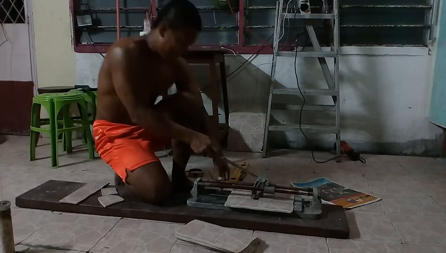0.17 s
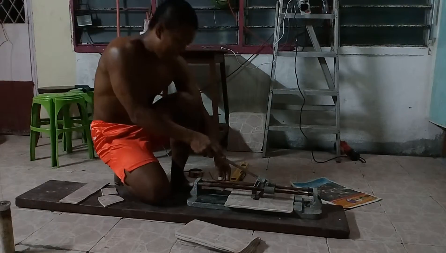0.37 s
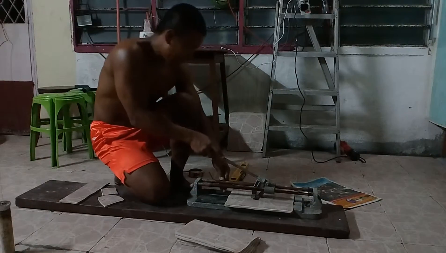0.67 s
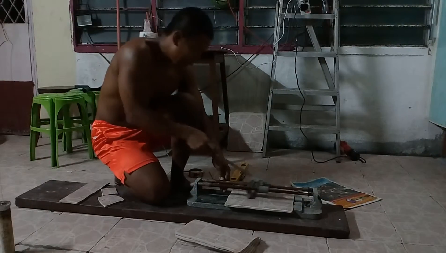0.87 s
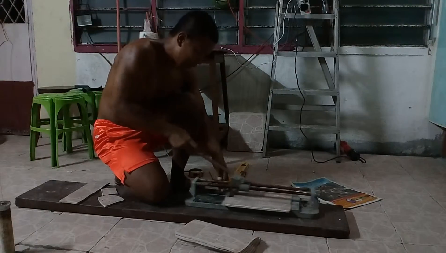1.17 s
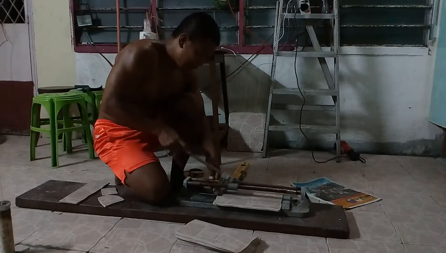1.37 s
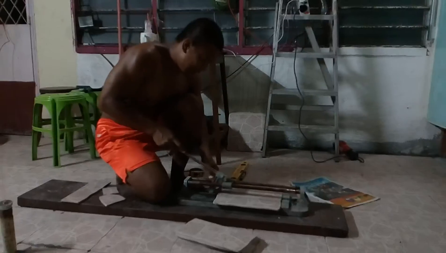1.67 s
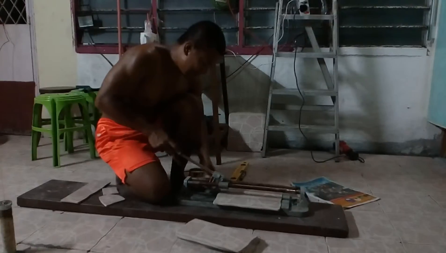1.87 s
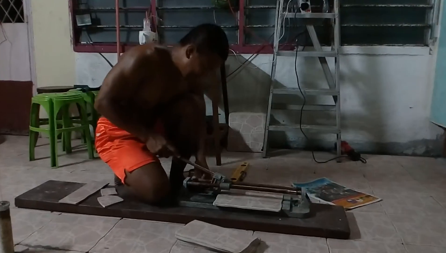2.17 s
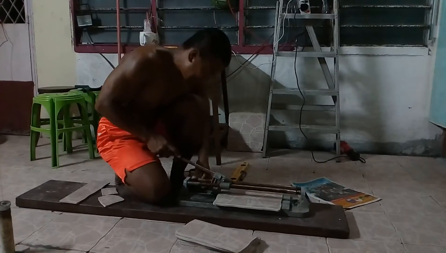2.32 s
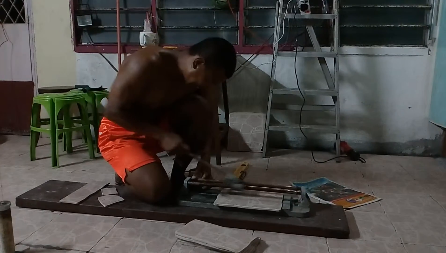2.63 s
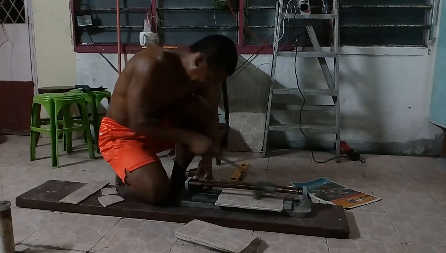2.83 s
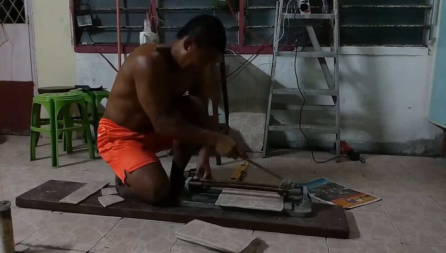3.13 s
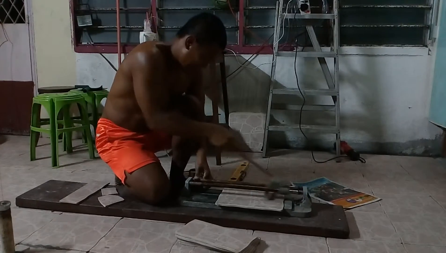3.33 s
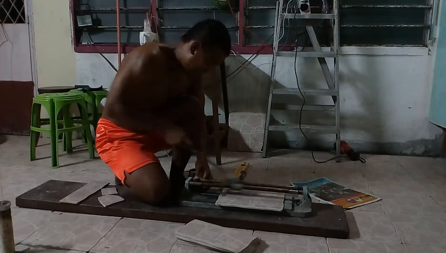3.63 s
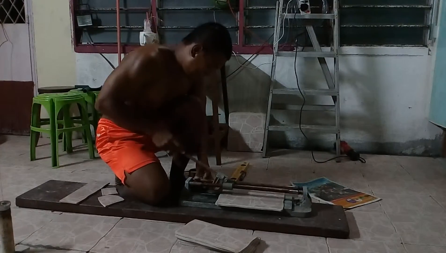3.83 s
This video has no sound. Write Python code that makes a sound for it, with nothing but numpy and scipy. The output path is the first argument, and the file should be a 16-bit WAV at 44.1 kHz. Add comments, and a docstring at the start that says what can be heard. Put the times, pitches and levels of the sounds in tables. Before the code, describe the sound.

A manual tile cutter's wheel loudly scores a tile after quiet handling clanks, in an echoing room.

```python
"""First the carriage of a manual tile cutter is drawn back, then its wheel bites, scores the tile and slides back.
The place is a bare tiled room: the cutter stands close ahead of two microphones, on a wooden board.
A dog barks once off to one side, farther away; a motor drones faintly far off under the room tone.
Scoring, sliding and rubbing are random grit through filters and resonances; knocks and chips are dying tones.
The bark is uneven pulses and gated air through a throat; random echoes set the distances."""
import sys
import numpy as np
from scipy import signal
from scipy.fft import rfft, irfft
from scipy.io import wavfile
from scipy.ndimage import uniform_filter1d, minimum_filter1d, map_coordinates

SR = 44100
rng = np.random.default_rng(int(sys.argv[2]) if len(sys.argv) > 2 else 0)


def store_pcm(level_fs):
    """Save levels as 16-bit WAV."""
    pcm = np.round(np.clip(level_fs, -1, 1) * 32767).astype(np.int16)
    wavfile.write(sys.argv[1], SR, np.atleast_2d(pcm).T)


N = 176400
T = np.arange(N) / SR
FILTER_SIZE = 32768  # samples
HZ = np.fft.rfftfreq(FILTER_SIZE, 1 / SR)

# Levels and spectra are relative, before the mix.
# room tone spectrum [f/Hz, level/dB per Hz]
AIR_SPECTRUM = [(25, -17), (44, -22.5), (67, -9.5), (115, -5), (167, -12.5), (240, -15.5), (520, -21),
                (1100, -29), (2000, -39), (3500, -44), (6500, -47.5), (8500, -63), (15000, -71)]
# partials of the distant motor [f/Hz, level/dB]
MOTOR_PARTIALS = [(62, -63), (82, -59.5), (102.3, -65.5), (123.8, -56.5)]
# slow swell of the motor [t/s, level/dB]
MOTOR_SWELL = [(0, 5), (1.4, 2), (2.3, 0.5), (4, 1.5)]
# decay of the room's echoes [f/Hz, t60/s]
ROOM_DECAY = [(150, 0.33), (600, 0.45), (2000, 0.43), (6000, 0.37), (14000, 0.32)]
# likeness of the diffuse sound at the two microphones [f/Hz, share]
MIC_LIKENESS = [(60, 0.69), (280, 0.83), (550, 0.64), (1000, 0), (3000, 0.062)]
AIR_DB = -49.5
PATH_TURNS_PER_S = 1.3  # how fast the echo paths change

# pitch of the bark, before jitter [t/s, f/Hz]
BARK_PITCH = [(3.66, 240), (3.69, 350), (3.715, 400), (3.742, 472), (3.78, 468), (3.8, 420), (3.825, 240)]
# loudness of the bark [t/s, level/dB]
BARK_LEVEL = [(3.658, -59), (3.678, -27.5), (3.694, -21.5), (3.722, -16.5), (3.745, -15.5), (3.77, -19.5),
              (3.8, -26), (3.84, -46), (3.88, -94)]
# throat resonances [f/Hz, width/Hz, level/dB]
THROAT_MODES = [(469.6, 48, -12), (728.3, 22, 10), (934, 26, -7), (1160, 32, -7), (1290, 51, -5.5),
                (1370, 50, -6), (1520, 25, -2), (1660, 110, -11), (2080, 18, -1), (2260, 35, -4),
                (2755, 60, -9)]
# colour of the muzzle [f/Hz, level/dB]
MUZZLE_SPECTRUM = [(150, -27), (340, -21.5), (450, -3), (600, -3.5), (760, 3), (1100, -2.5), (1400, 1.5),
                   (1800, -5), (2300, -3), (3050, -8), (3700, -36), (6000, -31.5), (12000, -51)]
# mouth opening [t/s, share]
JAW_OPENING = [(3.675, 0.72), (3.72, 1), (3.78, 0.94), (3.83, 0.85)]
BARK_JITTER, BARK_AIR_SHARE, BARK_UNEVEN = 0.045, 0.73, 0.57  # shares
SHUT_HZ = 1520  # lowpass of the nearly shut mouth

# the base shuddering under the carriage [t/s, level/dB]
SHUDDER_LEVEL = [(.88, -61), (.93, -46.5), (1.06, -38.5), (1.2, -39.5), (1.28, -49.5), (1.4, -42.5),
                 (1.47, -47.5), (1.62, -58.5), (2.42, -69), (2.48, -39.5), (2.63, -45), (2.73, -23),
                 (2.88, -30.5), (2.96, -33), (3.12, -34.5), (3.18, -27.5), (3.26, -67.5), (3.5, -51),
                 (3.68, -45.5), (3.8, -75)]
# the base groaning as the carriage sticks and slips [t/s, level/dB]
GROAN_LEVEL = [(1.29, -77), (1.318, -37), (1.355, -43), (1.415, -32.5), (1.45, -39), (1.48, -65),
               (1.56, -43), (1.6, -70.5), (1.64, -65), (1.66, -43.5), (1.69, -51.5), (1.72, -100)]
# knocks of the base on its board [t/s, level/dB, f/Hz]
KNOCKS = [(.92, -40.5, 535), (1.08, -30.5, 673), (1.16, -34, 608), (1.317, -31.5, 418), (1.951, -37, 441.5),
          (2.165, -27, 509.5), (2.711, -18, 520), (2.789, -22.5, 546), (2.861, -21, 499),
          (3.01, -22.5, 415), (3.18, -33, 587)]
# jolts that set the frame ringing [t/s, level/dB]
FRAME_JOLTS = [(1.06, -40), (3.18, -32)]
# the board flexing against the floor [t/s, level/dB]
BOARD_THUMPS = [(2.712, -29.5), (2.805, -22.5), (2.862, -24.5), (3.005, -33)]
# resonances of the cast base [f/Hz, width/Hz, level/dB]
BASE_MODES = [(435, 12, -10), (513.3, 14.4, 10.5), (568, 37, -5), (832, 140, -1.5), (823, 20.4, 3),
              (1085, 46, -9.5)]
# resonances of the wooden board [f/Hz, width/Hz, level/dB]
BOARD_MODES = [(172, 50, -2), (240, 62, -2), (333, 29, 5.5)]
# dull colour of base and board [f/Hz, level/dB]
THUD_SPECTRUM = [(60, -36), (130, -14.5), (270, -2.5), (480, 3.5), (800, 2.5), (1200, -5.5), (2000, -29),
                 (6000, -81)]
GROAN_HZ = 513
KNOCK_T60_S, KNOCK_RISE_S, KNOCK_THUD_DB = 0.12, 0.0007, -8.5
FRAME_HZ, FRAME_T60_S, FRAME_RISE_S = 829, 0.48, 0.0013

# carriage running on the rails [t/s, level/dB]
ROLL_LEVEL = [(.88, -72), (.91, -55), (.965, -49), (.995, -36), (1.035, -34.5), (1.07, -49.5), (1.145, -53),
              (1.165, -41.5), (1.195, -37.5), (1.23, -47.5), (1.52, -59), (1.58, -83)]
# soft sliding and rubbing [start t/s, peak t/s, end t/s, peak level/dB]
SLIDES = [(0.007, 0.112, 0.17, -54.5), (0.292, 0.423, 0.47, -57.5), (1.168, 1.37, 1.595, -37),
          (1.678, 1.864, 1.9, -59.5), (3.32, 3.546, 3.94, -44), (3.64, 3.789, 3.875, -32.5)]
# dry creak of the lever's pivot [t/s, level/dB]
CREAK_LEVEL = [(1.715, -67), (1.745, -49), (1.8, -74), (1.88, -63), (1.92, -82)]
# resonances of the rails [f/Hz, width/Hz, level/dB]
RAIL_MODES = [(1450, 140, -6.5), (2710, 47, 0), (2810, 67, -0.5), (3840, 84, -11.5), (4417, 19, 5.5),
              (4650, 30, 5), (4950, 27, 0.5), (5586, 44, -0.5), (6400, 38, -3.5), (6800, 35, -1.5),
              (8300, 66, -18)]
# resonances of the lever [f/Hz, width/Hz, level/dB]
LEVER_MODES = [(502, 16, 7), (735, 22, 7.5), (976, 136, 0), (1263, 60, -1), (1693, 140, -1),
               (2532, 68, 3.5), (2817, 206, -0.5), (4700, 49, -16), (5070, 69, -11.5)]
# colour of rubbing [f/Hz, level/dB]
RUB_SPECTRUM = [(200, 0.5), (600, 3.5), (1400, 4.5), (2500, 0), (3500, -2.5), (4500, 0), (7000, -5.5),
                (8300, -20.5), (11000, -25), (15000, -41)]
SLIDE_FADE_DB = 23  # how far a slide lies below its peak at either end

# sharp ticks of wheel and grit [t/s, level/dB]
TICKS = [(.042, -52), (.53, -61), (.8066, -45.5), (2.249, -37), (2.4605, -27.5), (2.5305, -29),
         (2.551, -35), (3.167, -25.5), (3.182, -26)]
# steel clanks [t/s, crack level/dB, rail ring level/dB, lever ring level/dB]
CLANKS = [(1.045, -45, -61, -38.5), (1.084, -41.5, -68, -30.5), (1.157, -37.5, -32, -36),
          (1.514, -68, -58, -42.5), (2.158, -34, -47, -26), (2.165, -48, -43.5, -32.5),
          (2.18, -44, -48, -36), (2.249, -46, -56, -44.5), (2.8025, -18.5, -17.5, -11.5),
          (2.860, -10, -21, -18.5)]
# colour of ticks [f/Hz, level/dB]
TICK_SPECTRUM = [(300, -14), (1000, 9), (2000, 5), (6500, 4.5), (8500, -4), (12500, -10), (15500, -17.5)]
# colour of clanks and snaps [f/Hz, level/dB]
CLANK_SPECTRUM = [(200, -26.5), (600, 2), (1700, 3), (3000, 5.5), (5000, 4), (7000, -5), (9000, -7),
                  (15500, -34)]

# chips snapping off the tile [t/s, level/dB, f/Hz]
SNAPS = [(2.8028, -3, 2760), (2.8068, -8, 3020), (2.8607, -6, 1950), (2.866, -7, 4230), (2.8695, -10, 1500),
         (2.8775, -9, 2170)]
SNAP_T60_S, SNAP_RISE_S = 0.011, 0.00028

# the wheel crunching into the glaze [t/s, level/dB]
BITE_LEVEL = [(2.455, -85), (2.463, -38), (2.52, -31), (2.56, -29), (2.62, -33.5), (2.67, -23),
              (2.72, -22.5), (2.8, -80)]
# the wheel scoring the glaze [t/s, level/dB]
SCORE_LEVEL = [(2.62, -67), (2.66, -24.5), (2.72, -14.5), (2.77, -11.5), (2.84, -12.5), (2.895, -7),
               (2.925, -11.5), (3.06, -14), (3.12, -21.5), (3.19, -36), (3.24, -62), (3.3, -88)]
# colour of the bite [f/Hz, level/dB]
CRUNCH_SPECTRUM = [(300, -52), (900, -19.5), (1900, -2), (2300, -11), (3100, -9), (3800, -7.5), (4600, -8),
                   (7000, -11.5), (9000, -14.5), (13000, -21.5), (15500, -24)]
# colour of the chipping glaze [f/Hz, level/dB]
GLAZE_SPECTRUM = [(300, -10.5), (900, -26.5), (1700, -6.5), (3000, -11), (5000, 6.5), (6900, 5),
                  (7600, -2.5), (10000, -4), (12500, -1), (15500, -13)]
# resonances of carriage and tile [f/Hz, width/Hz, level/dB]
STEEL_MODES = [(1690, 240, 5), (2160, 230, -2), (2750, 540, 7.5), (3113, 130, 9.5), (3480, 100, 4),
               (3930, 98, 7), (4410, 200, 6), (5480, 210, 6), (6370, 340, -16), (6650, 100, 4.5)]
# narrow ring of the scored tile [f/Hz, width/Hz, level/dB]
TILE_MODES = [(2075, 16, -1.5), (2920, 51, -5.5), (3105, 16, 2.5), (3545, 59, -1), (4900, 240, 7),
              (5620, 35, -5), (6770, 51, -12), (6640, 47, -3)]
DRIFT_S, DRIFT_RATE = 0.0012, 8  # wander of the steel: delay scale in s, knots a second

CEILING, LIMIT_S, TOP_HZ = 1, 0.0017, 15500  # limiter peak (full scale), window, band limit


def amp(db):
    """Decibels to gain."""
    return 10 ** (np.asarray(db) / 20)


def unit(x):
    """Scale to rms 1."""
    return x / np.sqrt(np.mean(x ** 2) + 1e-20)


def along(points, hz):
    """Interpolate (Hz, value) points on a log frequency axis."""
    f, v = np.transpose(points)
    return np.interp(np.log(hz + 1), np.log(f + 1), v)


def curve(rows):
    """(s, value) points as one value per sample."""
    return np.interp(T, *np.transpose(rows))


def level(rows):
    """(s, dB) points as a gain per sample, 120 dB down outside them."""
    return amp(np.interp(T, *np.transpose(rows), -120, -120))


def wobble(rate):
    """A smooth random curve, rate knots a second."""
    return map_coordinates(rng.standard_normal(int(N * rate / SR) + 4), [T * rate])


def filtered(x, h):
    """Convolve with an impulse response scaled to unit energy."""
    return signal.fftconvolve(x, h / np.linalg.norm(h))[:N]


def butter(order, hz, kind="low"):
    """Sections of a Butterworth filter."""
    return signal.butter(order, hz, kind, fs=SR, output="sos")


def colour(x, spectrum):
    """Shape the spectrum with a causal minimum-phase filter, built by folding the cepstrum."""
    cepstrum = irfft(np.log(amp(along(spectrum, HZ))))
    cepstrum[1:FILTER_SIZE // 2] *= 2
    cepstrum[FILTER_SIZE // 2 + 1:] = 0
    return filtered(x, irfft(np.exp(rfft(cepstrum))))


def ring(x, modes):
    """A bank of resonances with alternating signs, dark well above the highest mode."""
    response = 0
    for k, (f, width, db) in enumerate(modes):
        damping = 1j * HZ * width
        response = response + (-1) ** k * amp(db) * damping / (f * f - HZ * HZ + damping)
    edge_hz = min(1.5 * max(f for f, _, _ in modes), 15000)
    return filtered(x, signal.sosfilt(butter(3, edge_hz), irfft(response)))


def grit(rate, spread_db):
    """Tiny random fractures or slips of uneven size, rate a second, rms 1."""
    size = amp(spread_db * np.minimum(rng.exponential(size=N), 4))
    happens = rng.random(N) < rate / SR
    return unit(happens * size * rng.choice([-1, 1], N))


def blows(rows, chatter_s, chatter_db):
    """Each contact is an impulse, then dying chatter; levels are rms over a hundredth of a second."""
    out, t = np.zeros(N + SR), T[:SR // 10]
    for s, db, *_ in rows:
        burst = rng.standard_normal(len(t)) * np.exp(-t / chatter_s)
        burst *= amp(chatter_db) / np.linalg.norm(burst)
        burst[0] += 1
        burst *= np.sqrt(SR / 100) / np.linalg.norm(burst)
        out[round(s * SR):][:len(t)] += amp(db) * burst
    return out[:N]


def tone(s, hz, t60, rise_s):
    """One dying mode struck at time s."""
    t = np.maximum(T - s, 0)
    envelope = amp(-60 * t / t60) * (1 - np.exp(-t / rise_s))
    return np.sqrt(2) * np.sin(2 * np.pi * hz * t) * envelope


def diffuse(pair):
    """Blend two unrelated signals into a diffuse field at the two microphones."""
    size = pair.shape[1]
    likeness = along(MIC_LIKENESS, np.fft.rfftfreq(size, 1 / SR))
    turn = np.arccos(np.clip(likeness, -1, 1)) / 2
    mid, side = irfft(rfft(pair) * [np.cos(turn), np.sin(turn)], size)
    return np.array([mid + side, mid - side])


def echoes(x, early_db):
    """Noise dying at the room's rates gives floor and wall echoes and a tail for one place in the room."""
    noise = rng.standard_normal((2, SR * 3 // 4))
    hz, t, z = signal.stft(noise, SR, nperseg=256)
    decay = amp(-60 * t / along(ROOM_DECAY, hz)[:, None])
    tail = signal.istft(z * decay, SR, nperseg=256)[1]
    t = T[:tail.shape[1]]
    early = 1 + amp(early_db) * np.exp(-t / 0.0071)
    tail = diffuse(tail * (t > 0.002) * early)
    return signal.fftconvolve(x[None], tail / np.linalg.norm(tail[0]), axes=1)[:, :N]


def room(x, wet_db, lag_ms, pan_db, early_db):
    """Place a source: direct sound later on the left, plus echoes turning between two random sets of paths."""
    turn = 2 * np.pi * PATH_TURNS_PER_S * T
    wet = echoes(x * np.cos(turn), early_db) + echoes(x * np.sin(turn), early_db)
    half_lag = lag_ms * SR / 2000  # samples
    direct = np.array([map_coordinates(x, [np.arange(N) - side * half_lag]) for side in (1, -1)])
    mix = (direct + amp(wet_db) * wet) / np.hypot(1, amp(wet_db))
    return mix * amp([[pan_db / 2], [-pan_db / 2]])


def background():
    """Room tone is diffuse coloured noise; the far motor is a few low sines wavering in level and phase."""
    air = diffuse(np.array([colour(noise, AIR_SPECTRUM) for noise in rng.standard_normal((2, N))]))
    drone = np.zeros(N)
    for hz, db in MOTOR_PARTIALS:
        gain = amp(db + 0.79 * wobble(2.1))
        drone += gain * np.sqrt(2) * np.sin(2 * np.pi * hz * T + 0.78 * wobble(6))
    mix = amp(AIR_DB) * air + amp(curve(MOTOR_SWELL)) * drone
    return mix * amp([[-1.6], [1.6]])


def dog():
    """One hoarse bark: strong and weak pulses in turn and gated air, through throat, muzzle and jaw."""
    cycles = np.cumsum(curve(BARK_PITCH) * (1 + BARK_JITTER * wobble(300))) / SR
    clicks = np.diff(np.floor(cycles), prepend=0)
    alternate = 1 + BARK_UNEVEN * np.cos(np.pi * cycles)
    pulses = unit(clicks * alternate * amp(2.8 * wobble(250)))
    gate = 1 + np.cos(2 * np.pi * cycles)
    air = unit(rng.standard_normal(N) * gate * amp(2.5 * wobble(180)))
    source = np.sqrt(1 - BARK_AIR_SHARE) * pulses + np.sqrt(BARK_AIR_SHARE) * air
    source *= level(BARK_LEVEL)
    throat = signal.sosfilt(butter(6, 3300), ring(source, THROAT_MODES))
    voice = amp(1.5) * colour(source, MUZZLE_SPECTRUM) + amp(-7) * throat
    shut = signal.sosfiltfilt(butter(2, SHUT_HZ), voice)
    voice = shut + np.clip(curve(JAW_OPENING), 0, 1) * (voice - shut)
    return signal.sosfilt(butter(2, 140, "high"), voice)


def base():
    """The cast base shudders, groans, knocks on the board and rings on after a jolt; the board thumps."""
    shake = grit(rate=500, spread_db=2) * level(SHUDDER_LEVEL)
    groan = np.sqrt(2) * np.sin(2 * np.pi * GROAN_HZ * T + 0.45 * wobble(50))
    groan *= level(GROAN_LEVEL) * amp(0.88 * wobble(70))
    knocks = sum(amp(db) * tone(s, hz, KNOCK_T60_S, KNOCK_RISE_S) for s, db, hz in KNOCKS)
    thuds = amp(KNOCK_THUD_DB) * blows(KNOCKS, chatter_s=0.018, chatter_db=14)
    frame = sum(amp(db) * tone(s, FRAME_HZ, FRAME_T60_S, FRAME_RISE_S) for s, db in FRAME_JOLTS)
    frame *= amp(1.1 * wobble(45))
    board = ring(blows(BOARD_THUMPS, chatter_s=0.025, chatter_db=7), BOARD_MODES)
    body = amp(-2) * ring(shake, BASE_MODES)
    dull = colour(amp(-1) * shake + thuds, THUD_SPECTRUM)
    return body + dull + groan + knocks + frame + board


def carriage():
    """Slips along the rails ring rails and lever; the pivot creaks; lighter slides only hiss."""
    slips = grit(rate=2900, spread_db=1) * level(ROLL_LEVEL)
    rolling = amp(-1.5) * ring(slips, RAIL_MODES) + amp(-12) * ring(slips, LEVER_MODES)
    rubbing = amp(-9) * colour(slips, RUB_SPECTRUM)
    # the creak rings only the upper lever modes
    creak = ring(grit(rate=900, spread_db=-2.5) * level(CREAK_LEVEL), LEVER_MODES[4:])
    strokes = np.zeros(N)
    for start, peak, end, db in SLIDES:
        faint = db - SLIDE_FADE_DB
        strokes += level([(start, faint), (peak, db), (end, faint)])
    hiss = colour(grit(rate=7100, spread_db=3.5) * strokes, RUB_SPECTRUM)
    return rolling + rubbing + creak + hiss


def contacts():
    """Bright ticks are short blows; heavier clanks also ring rails and lever."""
    ticks = blows(TICKS, chatter_s=0.0035, chatter_db=15.5)
    cracks = blows(CLANKS, chatter_s=0.005, chatter_db=16)
    rails = blows([(s, db) for s, _, db, _ in CLANKS], chatter_s=0.0055, chatter_db=-35)
    lever = blows([(s, db) for s, _, _, db in CLANKS], chatter_s=0.0067, chatter_db=0.5)
    bright = colour(ticks, TICK_SPECTRUM) + colour(cracks, CLANK_SPECTRUM)
    return bright + amp(3.5) * ring(rails, RAIL_MODES) + amp(-1) * ring(lever, LEVER_MODES)


def snaps():
    """Each chip breaks away with a hard crack and a quickly damped ping."""
    pings = sum(amp(db) * tone(s, hz, SNAP_T60_S, SNAP_RISE_S) for s, db, hz in SNAPS)
    cracks = colour(blows(SNAPS, chatter_s=0.0014, chatter_db=1), CLANK_SPECTRUM)
    return amp(7) * pings + amp(-7) * cracks


def wheel():
    """The wheel crunches into the glaze, then chips it unevenly; resonances swell and wander as it travels."""
    bite = grit(rate=450, spread_db=3) * level(BITE_LEVEL)
    chips = grit(rate=1100, spread_db=2.5) * level(SCORE_LEVEL) * amp(2.6 * wobble(78))
    singing = np.zeros(N)
    for hz, width, db in TILE_MODES:
        swelling = chips * amp(2.1 * wobble(11))
        singing += amp(db) * ring(swelling, [(hz, width, 0)])
    wander = (T + DRIFT_S * wobble(DRIFT_RATE)) * SR
    steel = map_coordinates(ring(chips, STEEL_MODES), [wander])
    crunch = amp(-1) * colour(bite, CRUNCH_SPECTRUM) + amp(-6.5) * ring(bite, STEEL_MODES)
    score = amp(-10) * colour(chips, GLAZE_SPECTRUM) + amp(-9) * steel + amp(-24) * singing
    return crunch + score


def scene():
    """The cutter stands ahead of the microphones, the dog farther off to one side."""
    bark = room(dog(), wet_db=5, lag_ms=0.19, pan_db=0.5, early_db=5)
    board = room(base(), wet_db=-2, lag_ms=0.034, pan_db=-1, early_db=10)
    metal = wheel() + carriage() + contacts()
    steel = room(metal, wet_db=3.5, lag_ms=0.055, pan_db=-0.44, early_db=-2)
    chips = room(snaps(), wet_db=-3, lag_ms=0.047, pan_db=0.2, early_db=7)
    return background() + amp(3.5) * bark + amp(1.5) * board + amp(1) * steel + chips


def record(dry):
    """A fast limiter holds the peaks of both channels; a steep lowpass then sets the band limit."""
    size = max(int(LIMIT_S * SR), 2)
    need = np.minimum(1, CEILING / (np.abs(dry).max(axis=0) + 1e-9))
    gain = uniform_filter1d(minimum_filter1d(need, 2 * size), size)
    lowpass = signal.ellip(10, 0.1, 80, TOP_HZ, fs=SR, output="sos")
    return signal.sosfilt(lowpass, dry * gain)


dry = scene()
out = record(dry)
store_pcm(out)
```